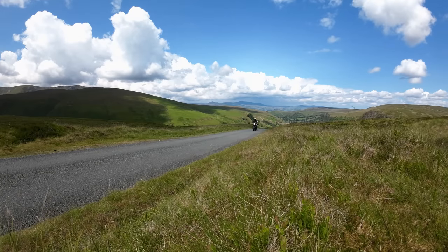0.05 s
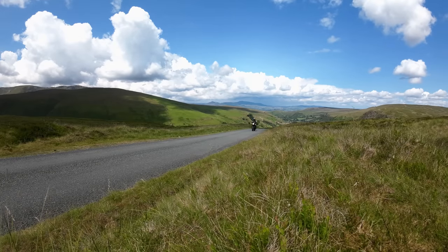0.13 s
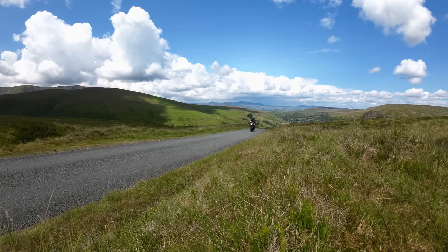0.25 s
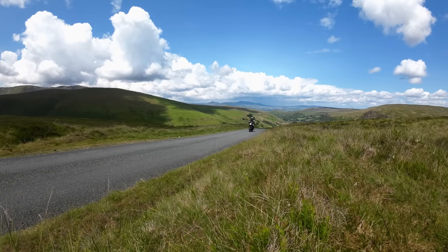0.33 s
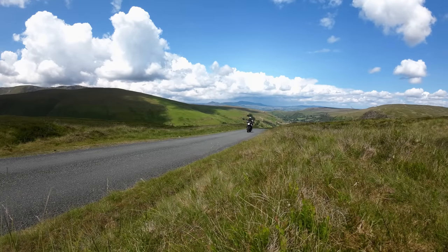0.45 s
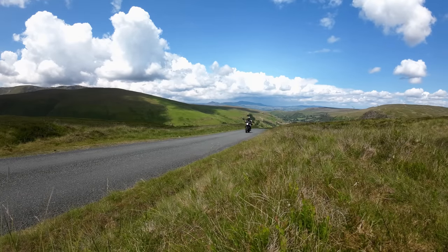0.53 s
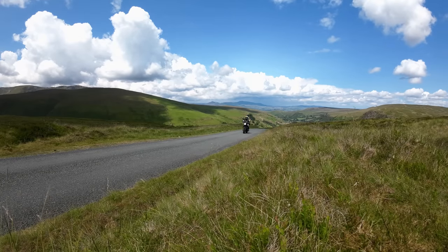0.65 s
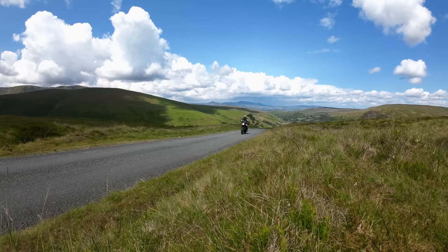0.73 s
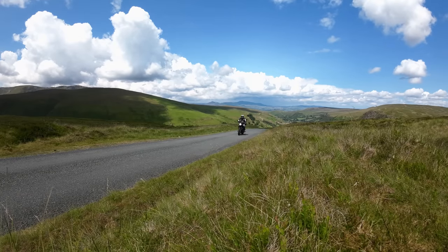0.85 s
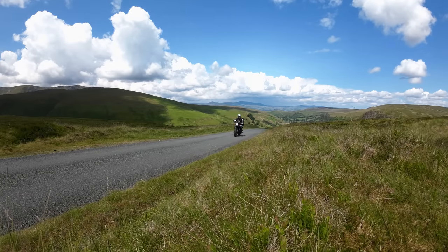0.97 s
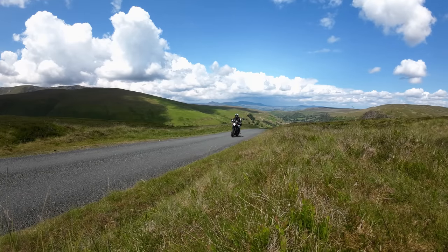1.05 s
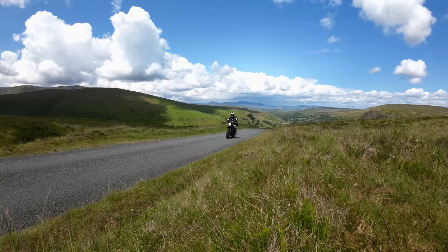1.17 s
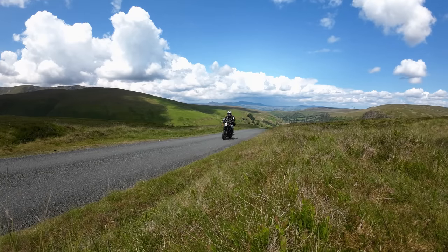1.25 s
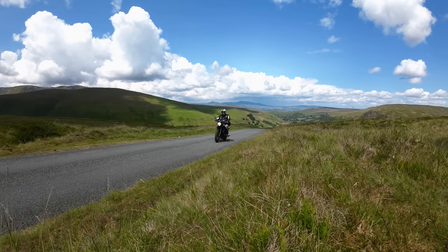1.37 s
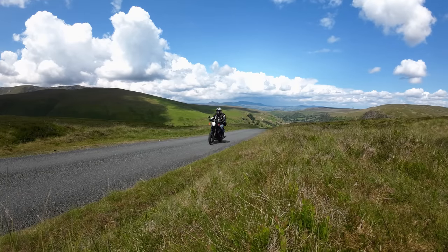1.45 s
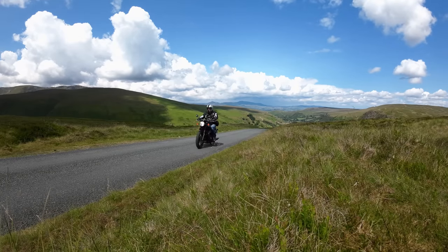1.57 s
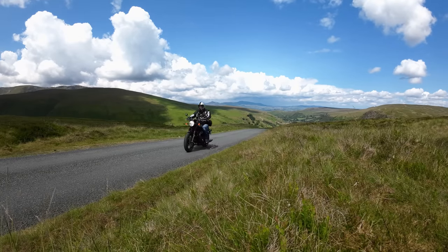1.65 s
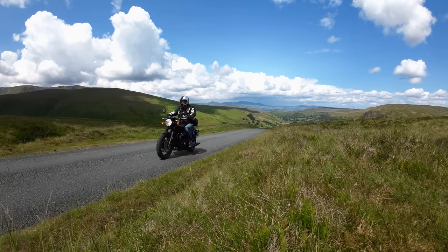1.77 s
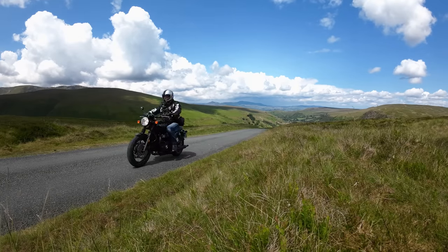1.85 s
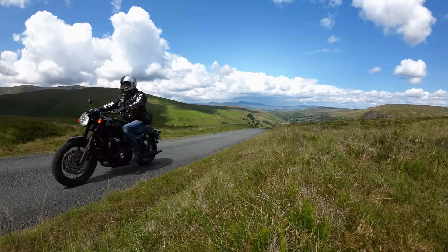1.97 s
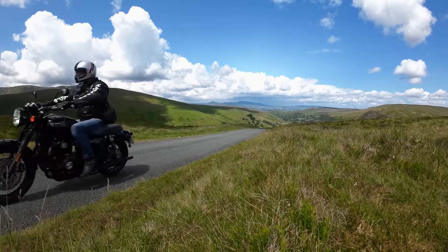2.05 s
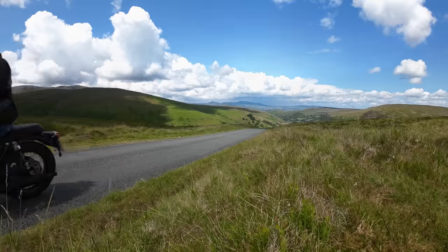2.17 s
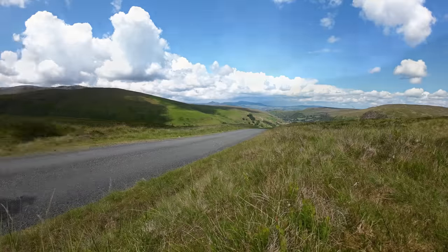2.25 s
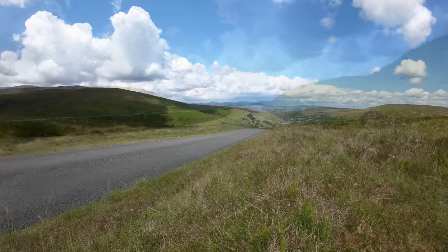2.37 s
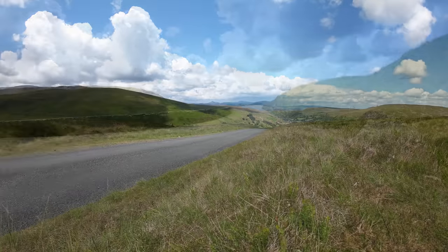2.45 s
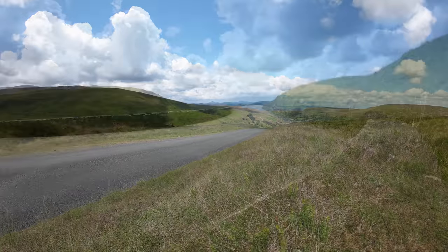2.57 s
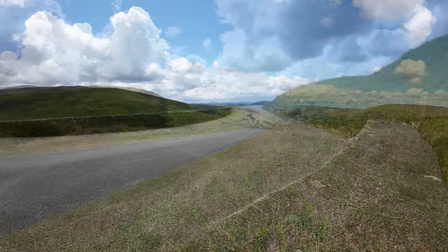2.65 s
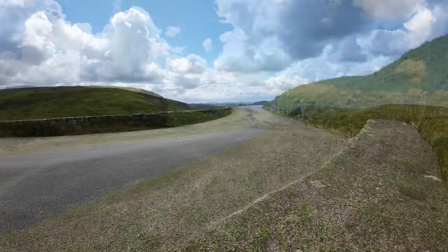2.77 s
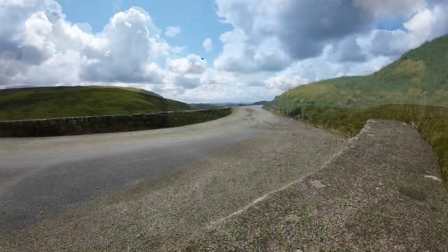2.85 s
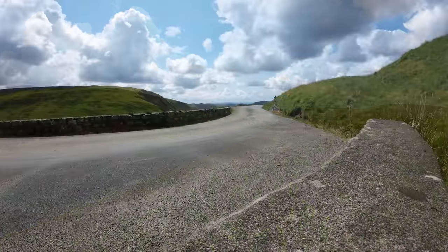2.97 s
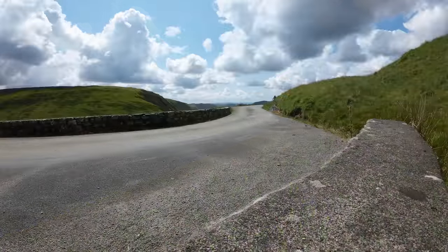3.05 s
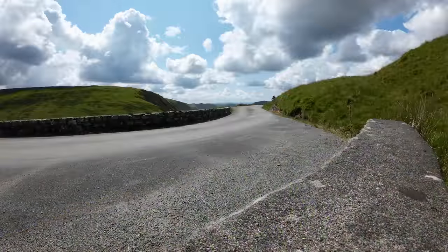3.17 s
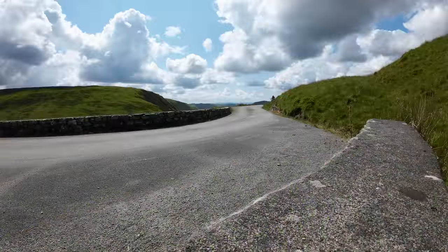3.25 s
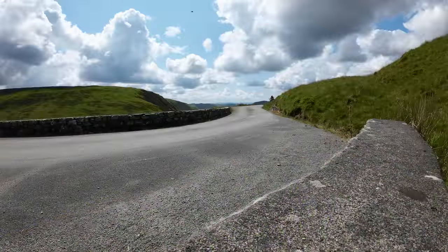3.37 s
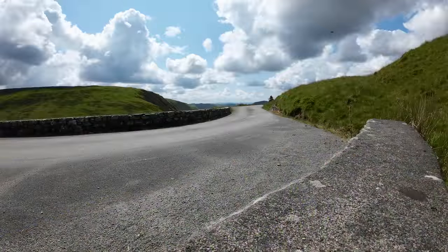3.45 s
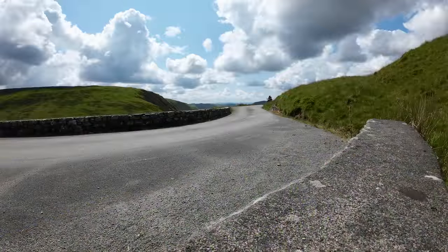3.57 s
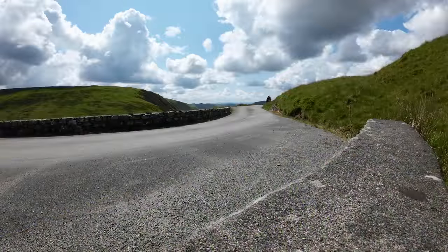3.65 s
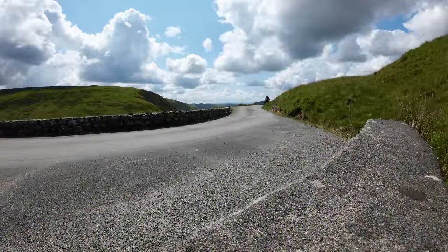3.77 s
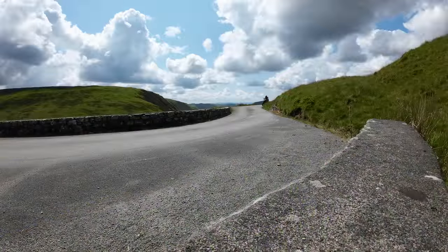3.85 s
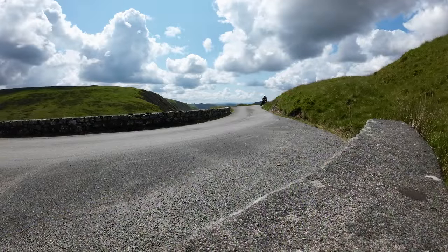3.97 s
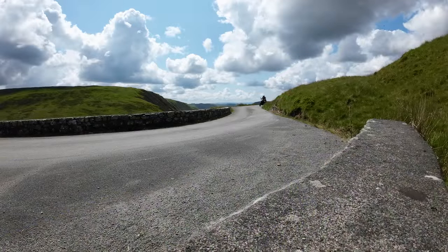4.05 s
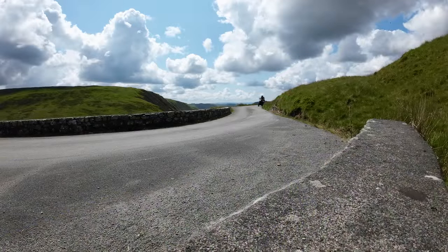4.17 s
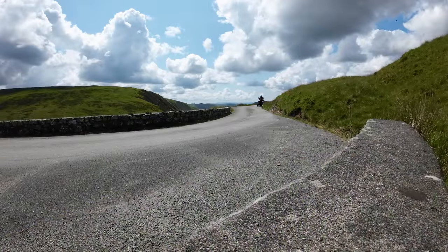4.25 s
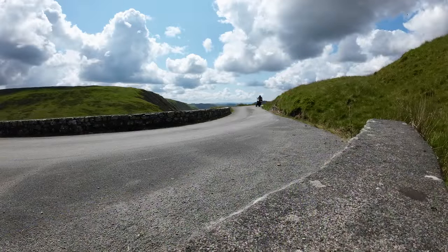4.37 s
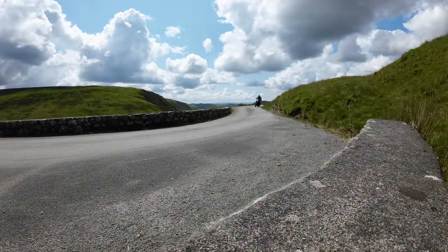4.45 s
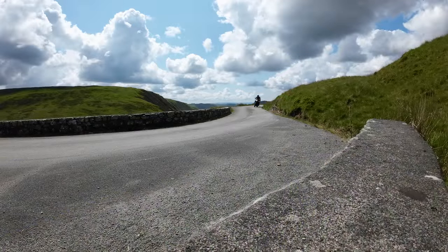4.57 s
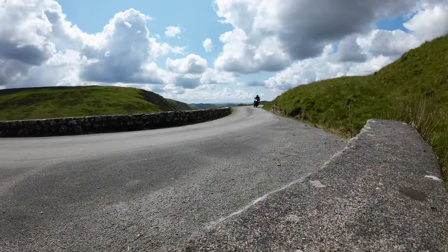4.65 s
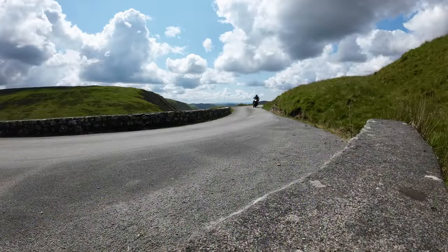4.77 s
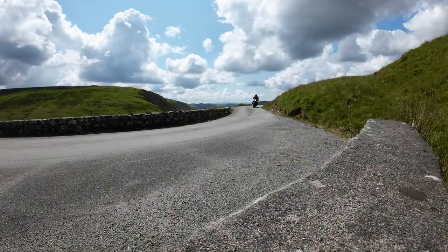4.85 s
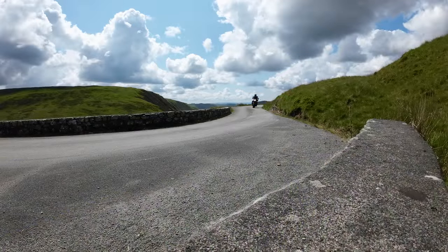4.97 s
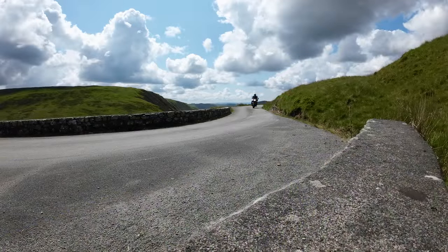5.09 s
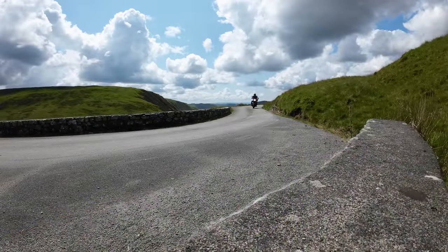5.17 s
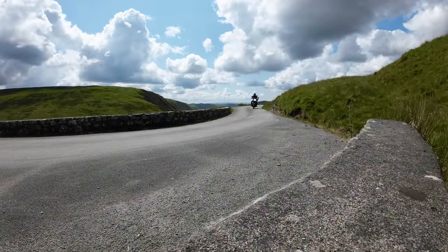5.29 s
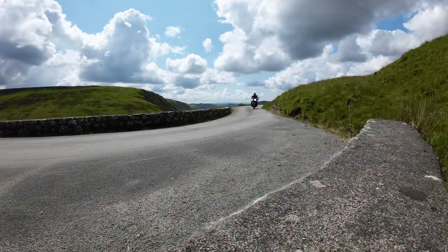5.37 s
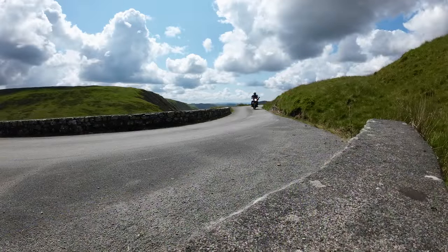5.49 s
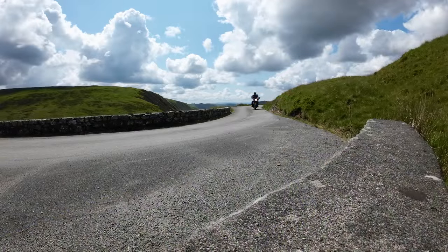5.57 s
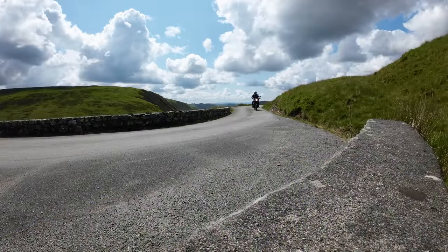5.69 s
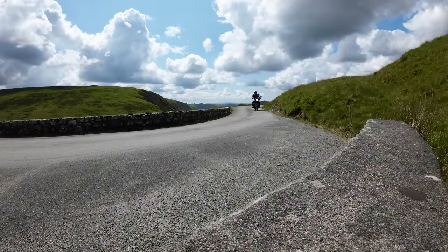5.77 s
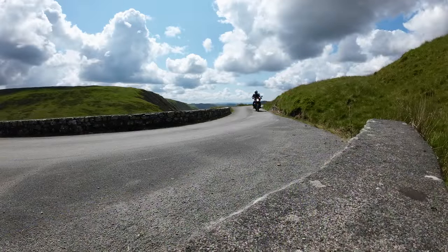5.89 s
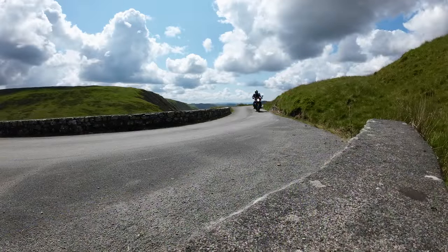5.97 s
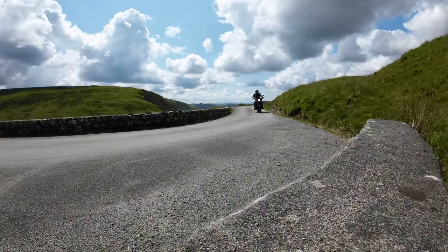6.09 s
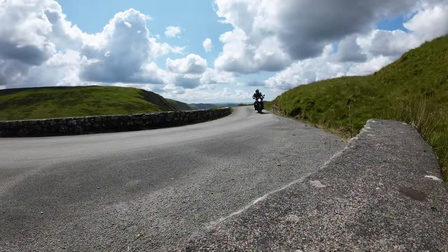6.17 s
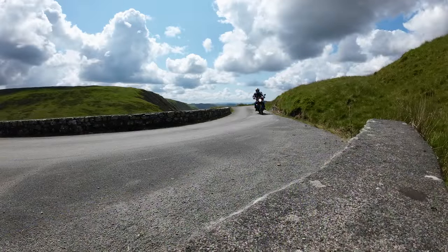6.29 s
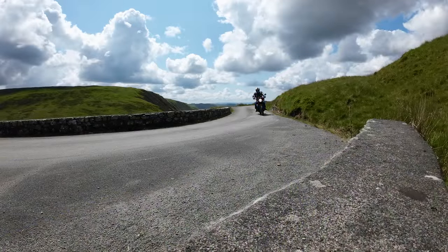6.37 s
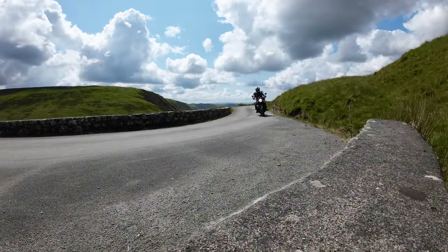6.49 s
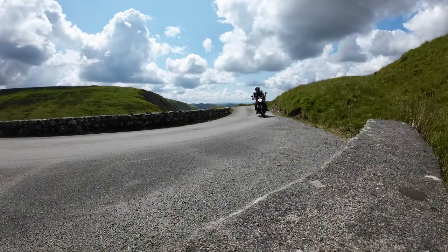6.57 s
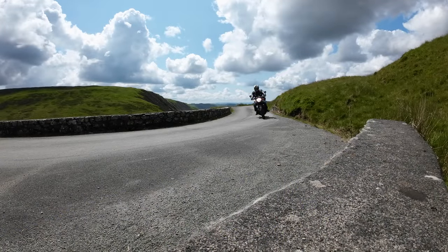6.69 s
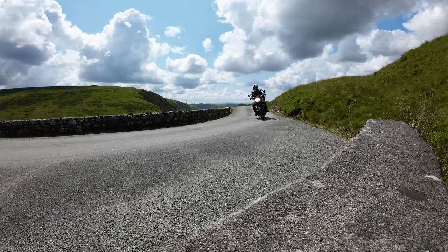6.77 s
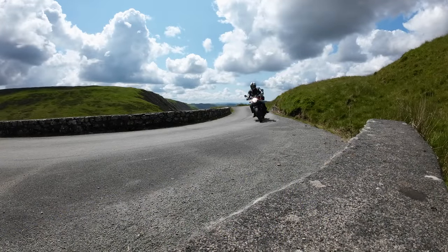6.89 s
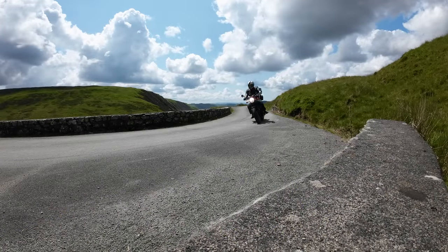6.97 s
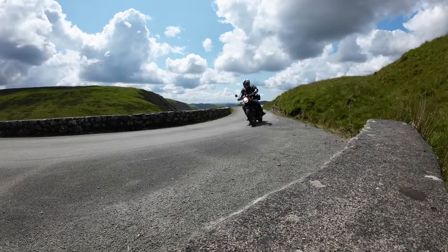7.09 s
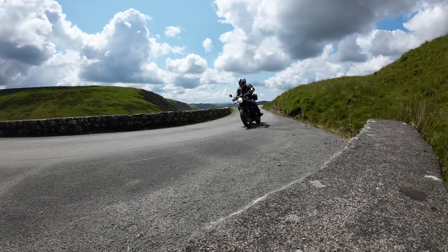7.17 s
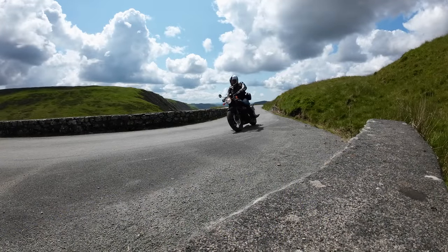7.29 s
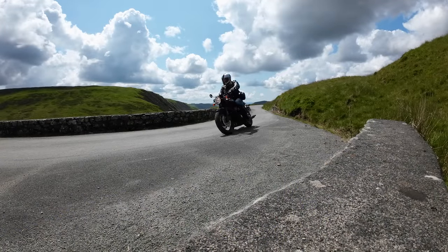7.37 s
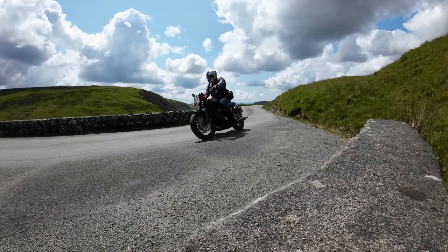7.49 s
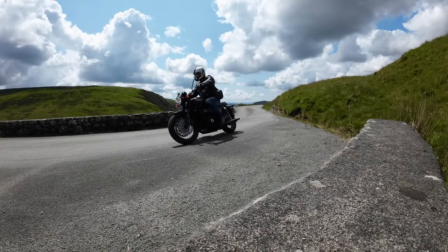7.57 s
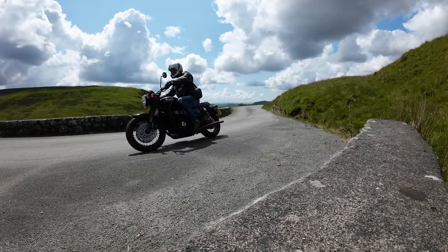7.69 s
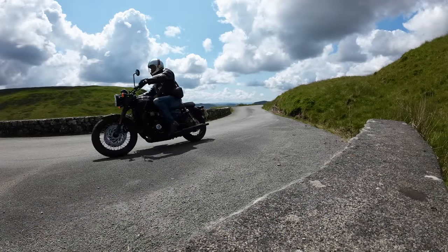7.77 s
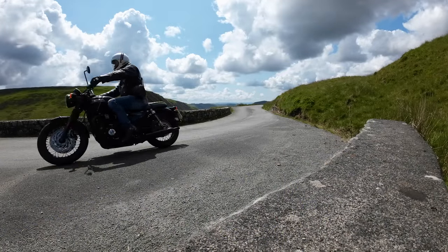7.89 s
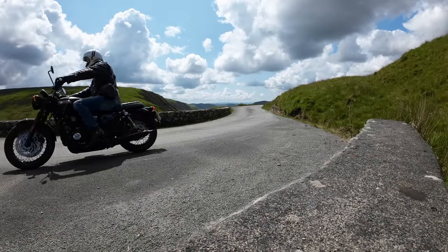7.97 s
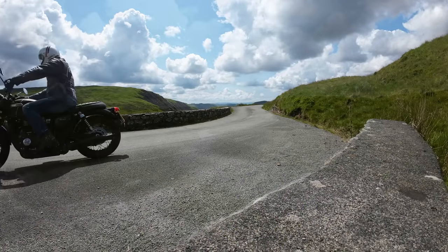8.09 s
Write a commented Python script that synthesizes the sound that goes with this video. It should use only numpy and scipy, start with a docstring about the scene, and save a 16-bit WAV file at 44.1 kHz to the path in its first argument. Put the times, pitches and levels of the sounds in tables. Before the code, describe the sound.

Two approaches of a throaty motorcycle on an open road: a quick close pass, then a slower, thudding climb easing into an uneven burble.

```python
"""Open moorland road, microphone at the verge in a light breeze. A parallel-twin motorcycle (270-degree
crank) rides past twice, one pass dissolving into the next. First it cruises up head-on and sweeps by
4.5 m off; then it pulls gently over a crest, shuts the throttle and burbles up to a walled bend, 2 m off.
Uneven firing pairs ring the exhaust, gears whine with the crank, valves clatter and tyres roll;
grit ticks, and at the bend a brake chirps."""
import sys
import numpy as np
from scipy import signal
from scipy.fft import rfft, irfft
from scipy.io import wavfile
from scipy.ndimage import uniform_filter1d

SR = 44100
rng = np.random.default_rng(int(sys.argv[2]) if len(sys.argv) > 2 else 0)


def persist_wave(psi):
    """Save psi, clipped to +-1, as 16-bit WAV."""
    counts = np.round(np.clip(psi, -1, 1) * 32767).astype(np.int16)
    wavfile.write(sys.argv[1], SR, np.atleast_2d(counts).T)


N = 358974

# the silencers come into view, first pass: time_s, share
PIPES_IN_VIEW = [(1.5, 0.03), (1.8, 0.37), (1.86, 1)]
# engine speed at the microphone, Doppler included, second pass: time_s, cycles_per_s
SECOND_SPEED = [(2.6, 18.47), (3.03, 15.03), (3.31, 14.87), (3.64, 12.59), (4.39, 16.18), (4.97, 18.27),
                (5.65, 19.82), (5.88, 17.55), (5.94, 18.85), (6.01, 18.75), (7.68, 15.05), (7.8, 14.27),
                (7.95, 12.47), (8.14, 11.76)]
# the throttle closes, second pass: time_s, share_shut
THROTTLE_SHUT = [(5.68, 0), (5.8, 1)]


def undb(db):
    """Decibels to gain."""
    return 10 ** (np.asarray(db) / 20)


def curve(rows):
    """Join (time_s, value) rows by straight lines; the end values hold."""
    times, values = np.transpose(rows)
    return np.interp(np.arange(N) / SR, times, values)


def unit(x):
    """Scale to rms 1."""
    return x / np.sqrt(np.mean(x ** 2))


def steady(x):
    """Scale to rms 1 over every few engine cycles."""
    size = SR // 4
    return x / np.sqrt(uniform_filter1d(uniform_filter1d(x ** 2, size), size) + 1e-12)


def blend(a, b, rows):
    """Equal-power mix; rows give time_s and the share of b."""
    share = np.clip(curve(rows), 0, 1)
    return a * np.sqrt(1 - share) + b * np.sqrt(share)


def walk(rate_hz):
    """Smooth random wander at rms 1."""
    step = max(int(SR / rate_hz), 8)
    held = rng.standard_normal(N // 8 + 1)[np.arange(N) // step]
    return unit(uniform_filter1d(uniform_filter1d(held, step), step))


def colour(x, points, peaks=(), rise=0):
    """Filter through (freq_hz, level_db) points, with resonances on top and steep ends."""
    size = 16384
    freq = np.maximum(np.arange(size // 2 + 1) * SR / size, 1)
    hz, db = np.transpose(points)
    octaves_outside = np.abs(np.log2(freq / np.clip(freq, hz[0], hz[-1])))
    db = np.interp(np.log(freq), np.log(hz), db) - 24 * octaves_outside
    for centre, width, boost in peaks:
        db = db + boost / (1 + (2 * (freq - centre) / width) ** 2)
    # rise 0 gives a sudden onset (minimum phase), rise 1 a gradual, symmetric one
    cepstrum = irfft(np.log(undb(db)))
    cepstrum[1:size // 2] *= 2 - rise
    cepstrum[size // 2 + 1:] *= rise
    response = np.roll(irfft(np.exp(rfft(cepstrum))), size // 2)
    return signal.fftconvolve(x, response)[size // 2:][:N]


def band(x, low_hz, high_hz, order=3):
    """Band-pass."""
    edges = [max(low_hz, 20), min(high_hz, SR / 2 - 100)]
    return signal.sosfilt(signal.butter(order, edges, "band", fs=SR, output="sos"), x)


def delayed(x, lag_s):
    """The sound a fixed or moving time later."""
    n = np.arange(N)
    return np.interp(n - lag_s * SR, n, x)


def ride(nearest_s, nearest_m, speed_m_s):
    """Distance to the microphone over the nearest distance, and how far the bike is tail-on (0-1)."""
    along = speed_m_s * (np.arange(N) / SR - nearest_s)
    distance = np.hypot(along, nearest_m)
    return distance / nearest_m, (np.maximum(along, 0) / distance) ** 2


def carried(parts, distance, hidden):
    """Gain of each part: it fades with every doubling of distance, and more when hidden."""
    return {name: undb(near_db - doubling_db * np.log2(distance) - hidden_db * hidden)
            for name, (near_db, doubling_db, hidden_db) in parts.items()}


def crank(speed, start):
    """Engine cycles so far, two crank turns each."""
    return start + np.cumsum(curve(speed)) / SR


def firings(cycles, scatter_db, jitter_s, lead_s, second_db=0, pops=()):
    """Two blows a cycle, 270 and 450 crank degrees apart, each with its own strength and delay."""
    marks = (np.arange(np.ceil(cycles[-1]))[:, None] + [0, 270 / 720]).ravel()
    chance = rng.standard_normal((len(marks), 2))
    at = np.interp(marks, cycles, np.arange(N), left=-SR, right=2 * N)
    at += SR * (jitter_s * chance[:, 0] - lead_s)
    db = scatter_db * chance[:, 1] + second_db * (np.arange(len(marks)) % 2)
    for time_s, pop_db in pops:
        db[np.argmin(np.abs(at - time_s * SR))] = pop_db
    inside = (at >= 0) & (at < N)
    return np.bincount(at[inside].astype(int), undb(db[inside]), N)


def exhaust(pulses, ring, gas_db, steep_s, rise):
    """Each blow builds as the valve opens, rings the pipe and drags a puff of turbulent gas after it."""
    wave = steady(colour(pulses, ring, rise=rise))
    # crests and troughs of a strong wave travel at different speeds, so one flank steepens into a bark
    wave = delayed(wave, steep_s * delayed(wave, steep_s * wave))
    puff = signal.lfilter([1], [1, -np.exp(-1 / (.014 * SR))], pulses)
    gas = band(puff * rng.standard_normal(N), 170, 390, order=2)
    return wave + undb(gas_db) * steady(gas)


def first_exhaust(cycles):
    """An even cruising beat turns round and rough side-on, then booms away with the throttle shut."""
    # ring of one firing from ahead, beside and behind: freq_hz, relative_db
    head_on = [(30, 1), (60, 9.5), (90, 6.5), (120, -5.5), (150, 10.5), (180, 8), (210, -27), (240, -3),
               (270, -6), (300, -19.5), (330, -18), (385, -27), (480, -25), (540, -24.5), (700, -38),
               (900, -28), (1500, -43)]
    broadside = [(25, -26), (45, -3.5), (60, -3.5), (80, 2.5), (110, 10), (140, -4), (170, -2.5),
                 (220, -20), (280, -19.5), (380, -36), (600, -55), (1500, -37.5)]
    going_away = [(25, -35), (40, 4), (58, 13.5), (80, -2.5), (100, 0.5), (120, 10), (160, -7.5),
                  (220, -15.5), (280, -32), (380, -35), (600, -60), (1500, -65)]
    # odd firings as the rider rolls off: time_s, db_over_usual_firing
    pops = [(.98, -5), (1.63, 2.5), (1.99, .8), (2.126, -2), (2.143, .2), (2.205, 1.2)]
    # unburnt charges going off in the pipe: time_s, db_over_usual_firing
    afterfire = [(2.131, -8), (2.184, -4), (2.737, -0.5), (2.93, -2)]
    # the turn from side-on to tail-on: time_s, share
    tail_on = [(2.27, 0), (2.522, 1)]
    bang_s, bang_db = np.transpose(afterfire)
    bangs = np.bincount((bang_s * SR).astype(int), undb(bang_db), N)
    even = firings(cycles, scatter_db=.25, jitter_s=.00003, lead_s=.003, second_db=-3.5, pops=pops)
    easing = firings(cycles, scatter_db=.4, jitter_s=.0001, lead_s=.003, pops=pops) + bangs
    closed = firings(cycles, scatter_db=1.2, jitter_s=.0003, lead_s=.004, second_db=-2.5) + bangs
    front = exhaust(even, head_on, gas_db=-36, steep_s=.00003, rise=.073)
    side = exhaust(easing, broadside, gas_db=-33, steep_s=.00007, rise=.42)
    behind = exhaust(closed, going_away, gas_db=-55, steep_s=.0001, rise=.54)
    return blend(front, blend(side, behind, tail_on), PIPES_IN_VIEW)


def rolling(cycles, cases, beat, spectrum=None):
    """Tyre roar and dense impacts through the cases, swelling with the valves; side-on by default."""
    # tyres and engine heard side-on: freq_hz, relative_db
    side_spectrum = [(260, -43), (450, 0.5), (930, 2), (1450, 5.5), (2130, -7.5), (2620, -14),
                     (2820, -11.5), (7500, -27), (11700, -34), (12600, -38), (15500, -44)]
    valves = 1 + beat * np.cos(2 * np.pi * 4 * cycles) + beat * np.cos(2 * np.pi * cycles)
    impacts = rng.standard_normal(N) * valves * undb(1.53 * walk(900))
    return steady(colour(impacts, spectrum or side_spectrum, cases))


def glancing(x, gain, drift):
    """Short reflections off tank, fins and road come and go as the bike leans, shifting the tone."""
    # reflection paths round the bike: lag_s
    lags = [.0005, .0009, .0014, .0021, .003]
    return x + sum(gain * walk(2.518) * delayed(x, lag_s * (1 + drift * walk(1.407))) for lag_s in lags)


def treble_swells(noise):
    """Narrow bands of the treble swell and fade."""
    # swells: peak_s, half_length_s, centre_hz, width_hz, boost_db
    swells = [(1.5, 0.16, 6630, 1100, 2.5), (4.313, .15, 6550, 800, 6.5), (5.322, 0.3, 5660, 910, 5.5),
              (7.33, 0.26, 6750, 700, 7), (7.625, 0.22, 4200, 600, 4.5)]
    t = np.arange(N) / SR
    out = noise.copy()
    for peak_s, half_length_s, hz, width, db in swells:
        boost = (undb(db) - 1) * np.exp(-((t - peak_s) / half_length_s) ** 2)
        out += boost * band(noise, hz - width / 2, hz + width / 2, order=1)
    return out


def running_gear(noise, gain, clatter_db, hiss_db):
    """Rolling noise reaches the microphone as roar, clatter and hiss, each dimmed at its own rate."""
    noise = glancing(noise, gain=.13, drift=.04)
    roar = steady(band(noise, 450, 2200)) * gain["roar"]
    clatter = steady(band(noise, 2200, 7000, order=5)) * gain["clatter"] * undb(clatter_db)
    hiss = steady(band(noise, 7000, 17000, order=5)) * gain["hiss"] * undb(hiss_db)
    return roar + treble_swells(clatter + hiss)


def gears(cycles, meshes, flutter, backlash, throb, surge=0):
    """Teeth sing at multiples of engine speed; crank surges spread each tone, backlash makes it rasp."""
    shaft = cycles + flutter * walk(45) + surge * np.sin(2 * np.pi * cycles)
    load = unit(1 + throb * np.cos(2 * np.pi * cycles))
    tones = 0
    for teeth, db in meshes:
        rattle = walk(70) + 1j * walk(70) + walk(400) / 2
        rasp = load * (1 + backlash * rattle) / np.hypot(1, 1.5 * backlash)
        tones = tones + undb(db) * np.real(rasp * np.exp(2j * np.pi * teeth * shaft))
    return tones


def engine_braking(cycles):
    """How hard the rear wheel drives the slowing crank (0-1)."""
    slowing = -np.gradient(np.gradient(cycles)) * SR ** 2
    full_slowing = 4  # cycles per second per second
    return uniform_filter1d(np.clip(slowing / full_slowing, 0, 1), size=SR // 8)


def transmission(cycles, primary, meshes, gain, nearest_s, beam_db, hum_db, surge):
    """The primary gears whine, louder under engine braking; the gearbox hums lower and rougher."""
    # clutch cover resonances that the whine glides through: centre_hz, width_hz, boost_db
    cover = [(1176, 95, 8), (1436, 120, 4)]
    whine = gears(cycles, primary, flutter=.001, backlash=.38, throb=.15, surge=surge)
    whine = colour(whine, [(200, 0), (16000, 0)], cover)
    hum = gears(cycles, meshes, flutter=.0024, backlash=.55, throb=.45)
    # beamed forward, the whine peaks just before the bike is nearest
    beam = np.exp(-((np.arange(N) / SR - nearest_s + .19) / .15) ** 2)
    whine_db = 3 * engine_braking(cycles) + beam_db * beam
    return whine * gain["whine"] * undb(whine_db) + hum * gain["gearbox"] * undb(hum_db)


def tappets(cycles, ring_s=.004, scatter_db=3):
    """Each valve ticks as it closes, never twice with the same strength."""
    # valve closings: place_in_cycle, relative_db
    valves = [(.1, 0), (.36, -10), (.6, -7), (.85, -9)]
    taps = 0
    for place, db in valves:
        turns = np.floor(cycles - place).astype(int)
        strength = undb(db + scatter_db * rng.standard_normal(turns[-1] + 1))
        taps = taps + np.diff(turns, prepend=turns[0]) * strength[turns]
    ring = signal.lfilter([1], [1, -np.exp(-1 / (ring_s * SR))], taps)
    spectrum = [(5000, 4.5), (8800, 2), (11300, -5), (13000, -10), (15200, -9)]
    return unit(colour(ring * rng.standard_normal(N), spectrum))


def first_pass(nearest_s=2.122):
    """The bike cruises up head-on and sweeps by; from behind, its body masks the engine."""
    # engine speed at the microphone, Doppler included: time_s, cycles_per_s
    speed = [(0.0, 29.93), (0.96, 29.81), (1.74, 29.02), (1.82, 28.6), (1.96, 25.8), (2.05, 26.9),
             (2.18, 25.9), (2.3, 23.5), (2.64, 18.03), (3.1, 14.9)]
    # how each part carries: nearest_db, loss_per_doubling_db, loss_from_behind_db
    carry = {"exhaust": (-8.5, 3.26, 3.9), "roar": (-36, 6.24, 6.5), "clatter": (-33, 6.95, 18.7),
             "hiss": (-47, 4.5, 17.7), "whine": (-41, 9.7, 7.7), "gearbox": (-38, 4.1, 24)}
    # exhaust loudness, subdued on approach, booming as the bike sweeps by: time_s, gain_db
    exhaust_loudness = [(0, -6.5), (.7, -7), (1.05, -10), (1.5, -8), (1.83, -7), (1.87, 1), (2.06, 1.4),
                        (2.2, 1.3), (2.39, -.5), (2.5, 1), (2.58, -2.5)]
    # thin front tone of tyres and engine: freq_hz, relative_db
    front_spectrum = [(260, -45), (450, -13), (1130, 0.5), (1350, 2.5), (1540, -12), (2010, -5),
                      (2190, -29), (2910, -6.5), (3970, -9.5), (4530, -13), (6570, -10.5), (11700, -27.5),
                      (15500, -38)]
    # resonances of cases and fins: centre_hz, width_hz, boost_db
    cases = [(1370, 290, 2), (1940, 630, 0.5), (2770, 190, -8), (4060, 430, 7.5), (6650, 110, 0.5),
             (9200, 160, 6.5), (9570, 350, -7), (11500, 180, 7)]
    # the last of the thin front tone fades from the tyre roar: time_s, share_of_side_tone
    front_fade = [(1.5, 0.83), (1.759, 0.96), (1.86, 1)]
    # hiss as the bike straightens out of the far bend: time_s, gain_db
    straighten = [(.2, -4), (.4, 1.5)]
    # primary and gearbox meshes: teeth_per_cycle, relative_db
    primary = [(53, -7), (100, 2), (200, -11)]
    gearbox = [(22.2, -10), (44.5, -8.5), (66.7, -13.5)]
    cycles = crank(speed, start=.762)
    distance, behind = ride(nearest_s, nearest_m=4.49, speed_m_s=11.67)
    gain = carried(carry, distance, behind)
    pipes = first_exhaust(cycles) * gain["exhaust"] * undb(curve(exhaust_loudness))
    front = rolling(cycles, cases, beat=.013, spectrum=front_spectrum)
    side = rolling(cycles, cases=(), beat=.032)
    drive = transmission(cycles, primary, gearbox, gain, nearest_s, beam_db=3.5, hum_db=1, surge=.0017)
    ticking = tappets(cycles) * gain["hiss"] * curve(PIPES_IN_VIEW) * undb(-14.5)
    buffeting = unit(band(rng.standard_normal(N), 20, 110, order=2)) * undb(-44 + 2.5 * walk(4))
    hiss_db = curve(straighten)
    running = running_gear(blend(front, side, front_fade), gain, hiss_db / 2, hiss_db)
    return pipes + running + drive + ticking + buffeting


def breeze(level_db):
    """Light wind rumbles on the microphone."""
    # wind rumble: freq_hz, relative_db
    spectrum = [(15, -13), (40, -47), (100, 1.5), (300, -12), (1000, -55)]
    return unit(colour(rng.standard_normal(N), spectrum)) * undb(level_db + 1.2 * walk(.93))


def second_exhaust(cycles):
    """Soft regular thuds under light throttle; with the throttle shut the charges burn unevenly."""
    # ring of one firing under load, coasting, in the bend and by the microphone: freq_hz, relative_db
    pulling = [(25, -18.5), (50, -19), (75, 4.5), (95, 8), (115, 12), (140, 3), (170, -10), (215, -22.5),
               (250, -15), (300, -20), (370, -27), (480, -47.5), (1500, -77.5)]
    overrun = [(25.0, -15), (40.0, -4), (55.0, 6), (75.0, 12.5), (95.0, 3.5), (115.0, 8.5), (140.0, 5),
               (170.0, -5.5), (220.0, -11.5), (280.0, -7), (380.0, -22), (600.0, -24), (1500.0, -69)]
    cornering = [(25, -7), (45, 1), (58, 9.5), (72, -28), (95, 7), (120, 9.5), (140, -0.5), (170, -14.5),
                 (210, -2.5), (280, -20), (380, -44), (600, -47), (1500, -68)]
    abreast = [(25, -21), (45, 16), (60, 8), (80, -2), (100, 11.5), (120, 14.5), (140, 0.5), (180, -7),
               (220, -26), (280, -34), (380, -30), (600, -41), (1500, -56)]
    # charges that pop with the throttle shut: time_s, db_over_usual_firing
    pops = [(5.772, 4.5), (5.847, 3.5), (6.168, 2.5), (6.2, 0.5), (6.31, 2), (6.425, 1), (6.535, 1),
            (6.558, 3), (6.65, 1.5), (6.71, 2.5), (6.768, 2), (6.835, .5), (6.912, 3), (7.09, 0),
            (7.277, 1), (7.378, 3), (7.573, 5), (7.8, 1), (7.87, 2), (7.948, 2), (8.028, 0), (8.08, -1.5),
            (8.11, -2)]
    # the bike enters the walled bend: time_s, share
    in_bend = [(6.8, 0.4), (7.12, 0.99), (7.5, 0.83)]
    # echo off the stone wall, later as the bike draws away from it: time_s, lag_s
    wall_lag = [(7.0, .0232), (7.6, .0243), (7.9, .0275)]
    # the silencers swing towards the microphone: time_s, share
    swing = [(7.621, 0), (7.92, 0.96)]
    even = firings(cycles, scatter_db=.3, jitter_s=.00005, lead_s=.011)
    ragged = firings(cycles, scatter_db=1.7, jitter_s=.0007, lead_s=.004, second_db=-1.5, pops=pops)
    effort = np.clip((curve(SECOND_SPEED) - 12) / 7, 0, 1)
    thuds = -exhaust(even, pulling, gas_db=-56, steep_s=.0005 * effort, rise=0)
    burble = exhaust(ragged, overrun, gas_db=-21, steep_s=.00026, rise=.35)
    bend = exhaust(ragged, cornering, gas_db=-17, steep_s=.00004, rise=.19)
    bend = steady(bend + .45 * delayed(bend, curve(wall_lag)))
    boom = exhaust(ragged, abreast, gas_db=-24.5, steep_s=.00005, rise=.42)
    coasting = blend(blend(burble, bend, in_bend), boom, swing)
    return blend(thuds, coasting, THROTTLE_SHUT)


def second_pass(nearest_s=7.94, crest_s=3.63, climb_s=1.62):
    """Only the thuds clear the crest at first; then the bike comes into view and rolls up to the bend."""
    # how each part carries: nearest_db, loss_per_doubling_db, loss_behind_crest_db
    carry = {"exhaust": (-18.5, 1.23, 0.37), "roar": (-39.5, 2.52, 16.6), "clatter": (-40.5, 4.11, 15.7),
             "hiss": (-53.5, 4.1, 11.6), "whine": (-44, 1.4, 26), "gearbox": (-50.5, 1, 22)}
    # exhaust loudness, the thuds and burble swelling and easing: time_s, gain_db
    exhaust_loudness = [(4.5, -7), (5.5, -2.5), (5.83, -7.5), (6.05, -2.5), (6.3, -2.5), (6.7, -5),
                        (6.95, -6), (7.15, -1.5), (7.9, -4), (8.14, 2.5)]
    # tyres and engine heard head-on: freq_hz, relative_db
    front_spectrum = [(260, -22), (450, 0), (600, -2), (790, -6.5), (958, -4), (1250, -2.5), (1520, -8),
                      (1840, -6.5), (2230, -21.5), (5420, -23.5), (11500, -47.5), (15500, -52)]
    # resonances of cases and fins, head-on and side-on: centre_hz, width_hz, boost_db
    front_cases = [(795, 43, 12.5), (1330, 60, 2.7), (2060, 24, 5.5), (2586, 150, 6), (3850, 2000, 4),
                   (4700, 560, -7.5), (5170, 84, -4.5), (5800, 320, -2.5), (6400, 270, -1.5),
                   (8800, 180, 3), (11160, 400, 8.5)]
    side_cases = [(620, 120, 3), (800, 200, -4.5), (1820, 110, 3.5), (3980, 500, 2.5)]
    # the cylinder head turns towards the microphone: time_s, share
    head_in_view = [(5.0, 0.6), (6.7, 0.6), (7.1, 0.7), (7.6, 1)]
    # the turn to side-on, which dims the gearbox: time_s, share
    side_on = [(6.75, 0), (7.15, 0), (7.7, 0.55)]
    # primary, gearbox and a mesh that sings only under load: teeth_per_cycle, relative_db
    primary = [(100, -3.5), (200, -14.5), (300, -22)]
    gearbox = [(44.5, 3.5), (66.7, 0.5), (71.5, -2), (89, -5.5), (111.2, -14), (133.4, -25)]
    pull_mesh = [(53, -4.5)]
    t = np.arange(N) / SR
    cycles = crank(SECOND_SPEED, start=.903)
    distance, _ = ride(nearest_s, nearest_m=2.04, speed_m_s=10.1)
    hidden = (1 - np.clip((t - crest_s) / climb_s, 0, 1)) ** 2
    gain = carried(carry, distance, hidden)
    pipes = second_exhaust(cycles) * gain["exhaust"] * undb(curve(exhaust_loudness))
    front = rolling(cycles, front_cases, beat=.038, spectrum=front_spectrum)
    side = rolling(cycles, side_cases, beat=.046)
    noise = blend(front, side, [(7.1, .043), (7.7, .71)])
    ticking = tappets(cycles) * gain["hiss"] * curve(head_in_view) * undb(-1)
    pulling = 1 - curve(THROTTLE_SHUT)
    # the crank surges within each cycle; when coasting, more as it slows
    surge = .0032 * pulling + .0016 * (1 - pulling) * (17 / curve(SECOND_SPEED)) ** 3
    drive = transmission(cycles, primary, gearbox, gain, nearest_s,
                         beam_db=6.5, hum_db=-6 * curve(side_on), surge=surge)
    drive += gears(cycles, pull_mesh, flutter=.002, backlash=.56, throb=.55) * gain["gearbox"] * pulling
    # the treble swells briefly as the bike tops the crest
    swell_db = 8 * np.exp(-((t - 4.436) / .25) ** 2)
    return pipes + running_gear(noise, gain, swell_db, swell_db / 2) + drive + ticking


def grit():
    """Grit and small metallic ticks: bursts of noise that die within milliseconds."""
    # ticks: start_s, peak_db, centre_hz, width_hz, decay_s
    ticks = [(3.187, -52, 850, 500, .004), (3.477, -48, 1100, 900, .004), (3.508, -46, 1400, 1500, .003),
             (3.557, -46, 850, 600, .004), (5.482, -46, 9000, 12000, .001), (5.548, -48, 9000, 12000, .001),
             (7.416, -42, 9500, 6000, .002), (7.583, -43, 9000, 5000, .002),
             (7.705, -34, 10000, 10000, .001), (7.713, -30, 9000, 12000, .002),
             (7.734, -39, 9000, 6000, .002), (7.870, -36, 14000, 2500, .005),
             (7.902, -22, 3200, 2000, .001), (7.948, -35, 12000, 7000, .004),
             (8.040, -39, 9000, 7000, .003), (8.078, -39, 8600, 1200, .004), (8.085, -32, 4200, 1200, .006),
             (8.086, -37, 11500, 5000, .006)]
    out = np.zeros(N)
    t = np.arange(SR // 20) / SR
    for start_s, db, hz, width, decay_s in ticks:
        burst = rng.standard_normal(len(t)) * np.exp(-t / decay_s)
        tick = band(burst, hz - width / 2, hz + width / 2)
        out[int(start_s * SR):][:len(t)] += undb(db) * tick / np.abs(tick).max()
    return out


def brake():
    """The pad chirps as it touches the disc, its pitch wavering as it slips."""
    # chirps: peak_s, relative_db, pitch_hz, rise_and_decay_s
    chirps = [(7.871, -31, 12500, 0.0035), (8.090, -48, 11450, 0.0035), (8.1, -44, 10800, 0.0055)]
    out, t = np.zeros(N), np.arange(N) / SR
    slip = .25 * walk(450)
    for peak_s, db, hz, decay_s in chirps:
        envelope = 2 * undb(db) * np.exp(-np.abs(t - peak_s) / decay_s)
        out += envelope * np.sin(2 * np.pi * (hz * t + slip))
    return out


def scene():
    """Both passes, grit, brake and breeze at one microphone."""
    # the first pass dissolves into the second: time_s, share_of_second
    dissolve = [(2.62, 0.28), (3.129, 1)]
    bike = blend(first_pass(), second_pass(), dissolve)
    return (bike + grit() + brake() + breeze(level_db=-47))[None]


def record(dry):
    """The recorder cuts the treble steeply above 15.75 kHz."""
    return signal.sosfilt(signal.ellip(10, .1, 80, 15750, fs=SR, output="sos"), dry)


dry = scene()
out = record(dry)
persist_wave(out)
```